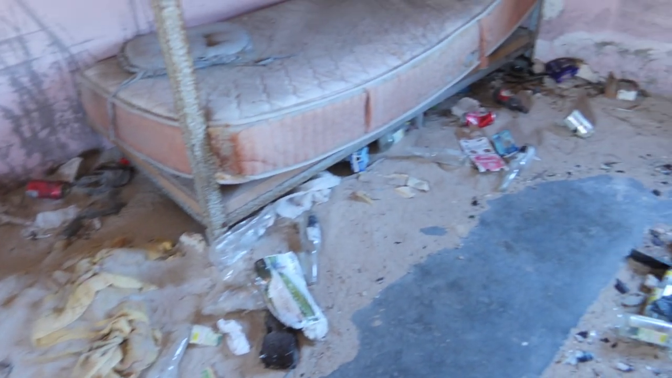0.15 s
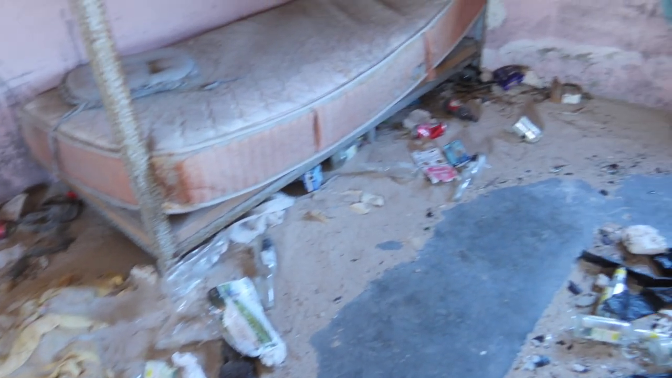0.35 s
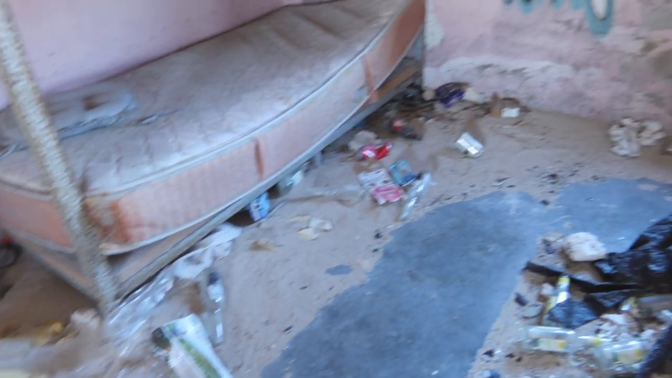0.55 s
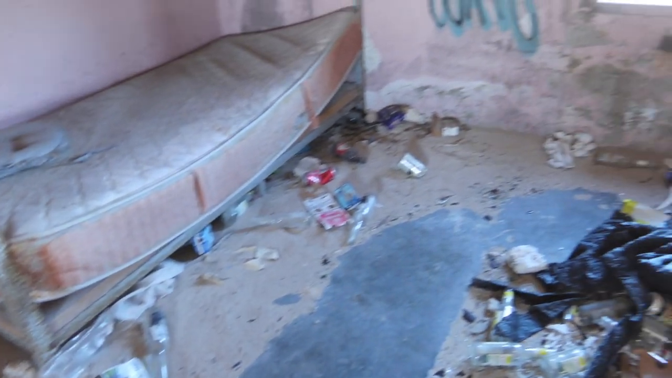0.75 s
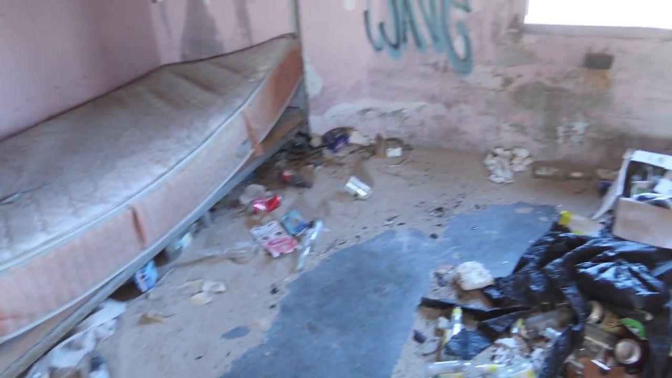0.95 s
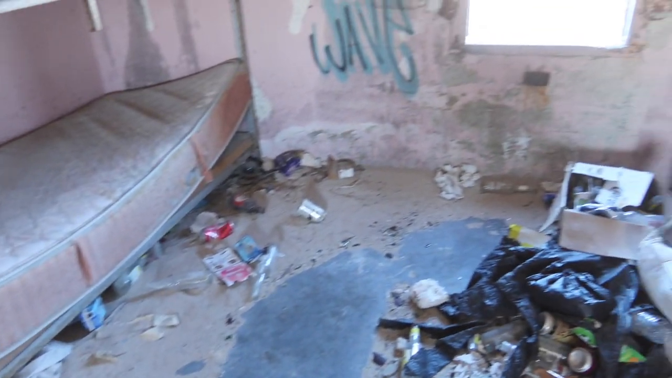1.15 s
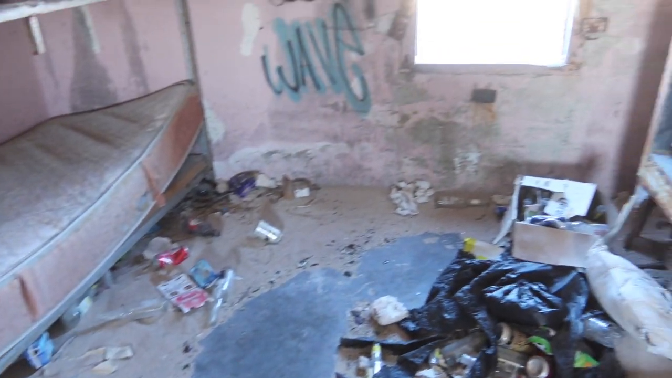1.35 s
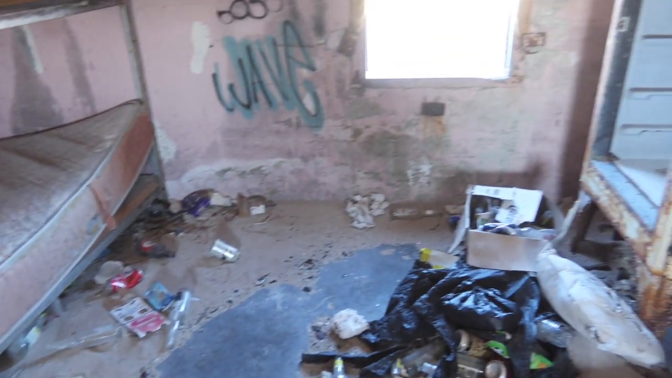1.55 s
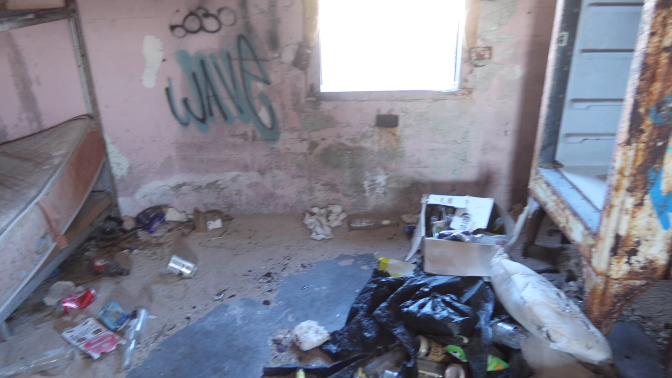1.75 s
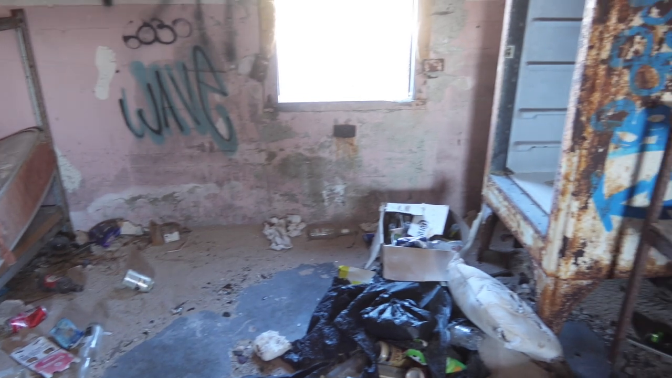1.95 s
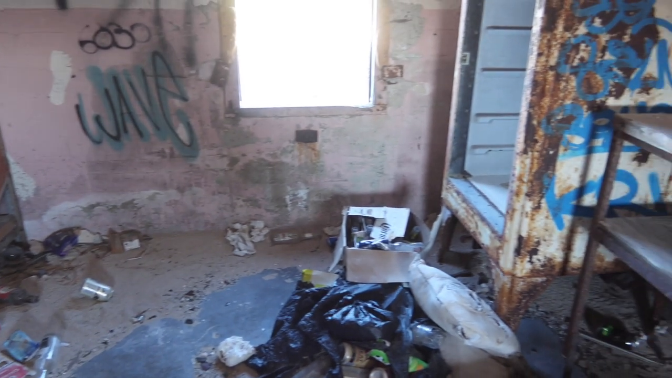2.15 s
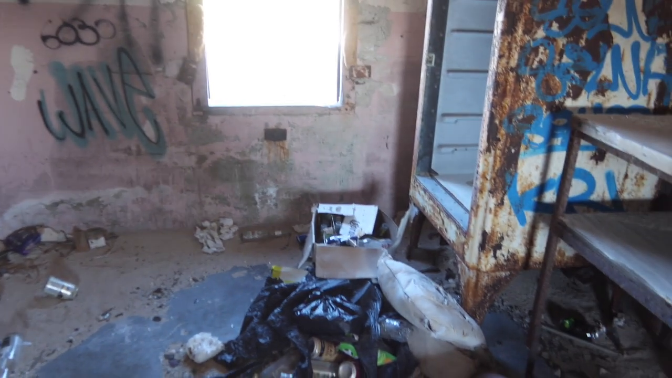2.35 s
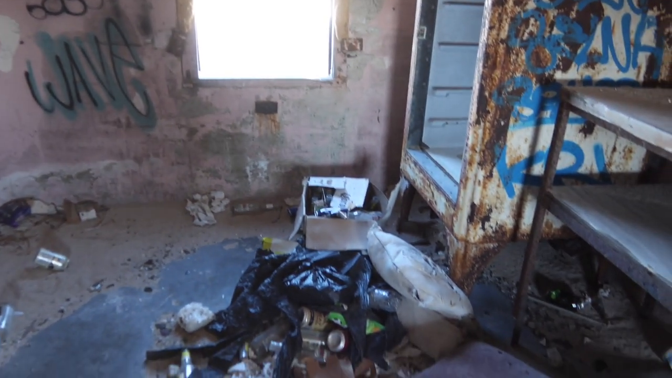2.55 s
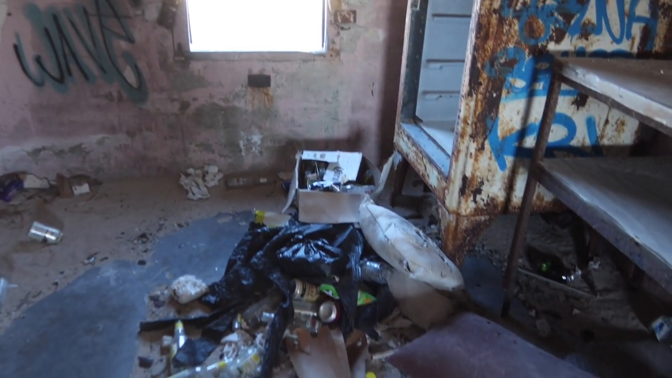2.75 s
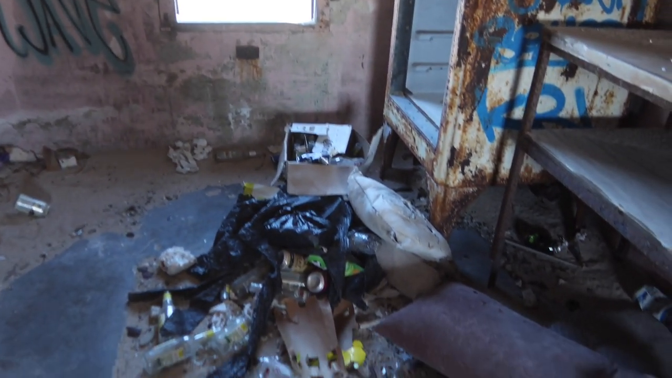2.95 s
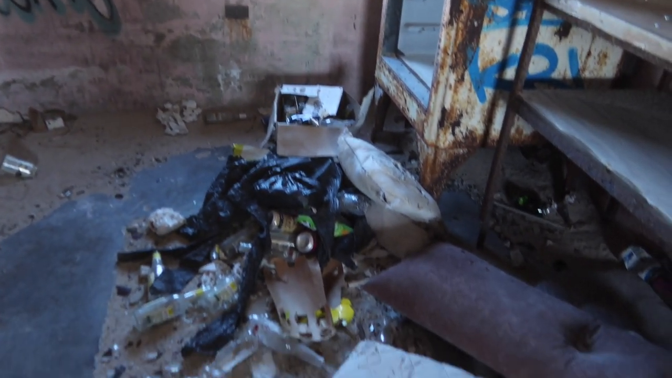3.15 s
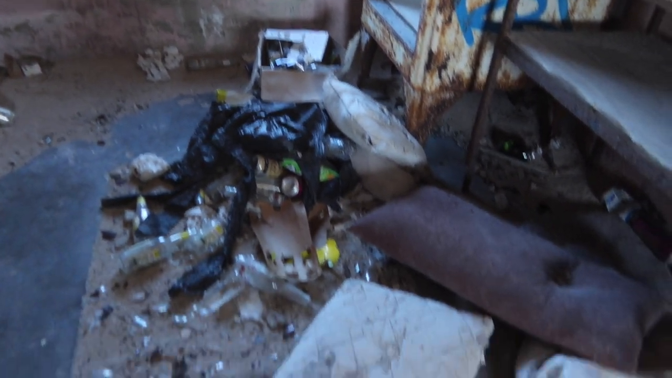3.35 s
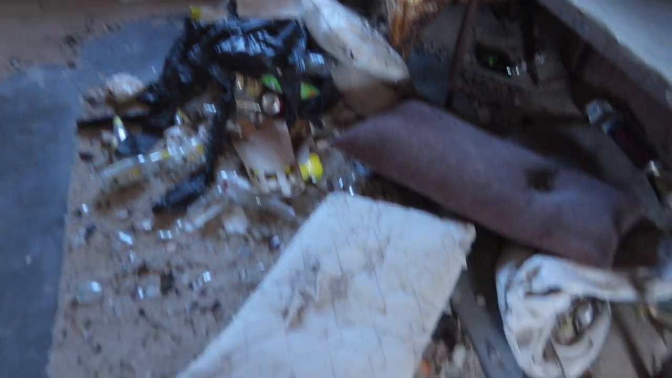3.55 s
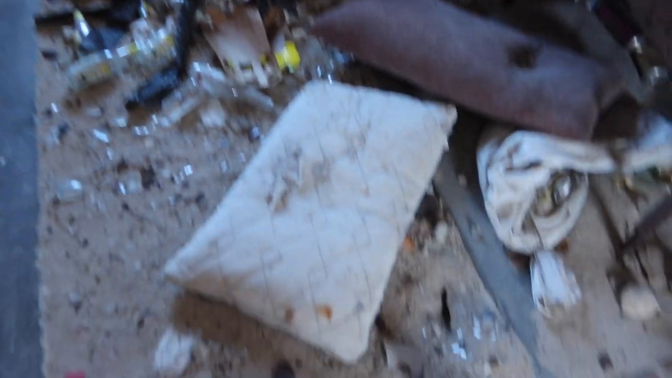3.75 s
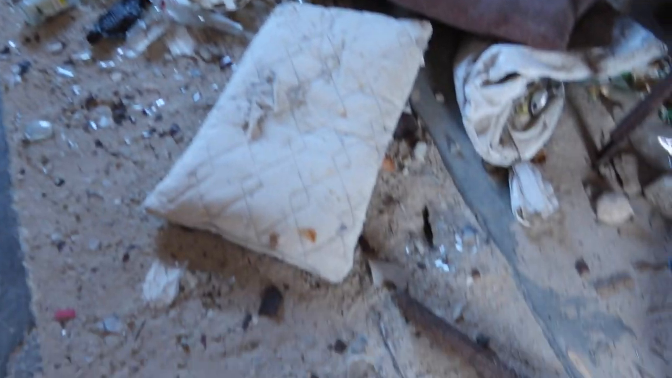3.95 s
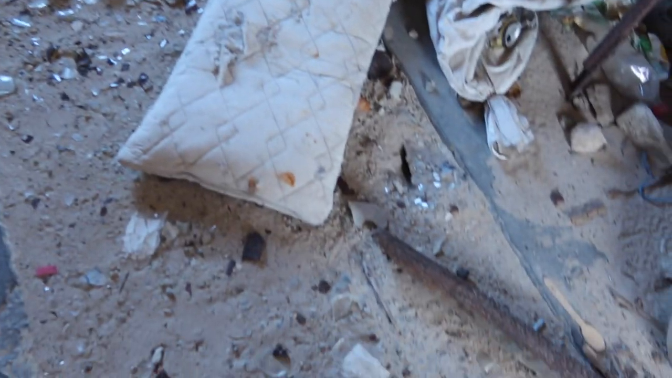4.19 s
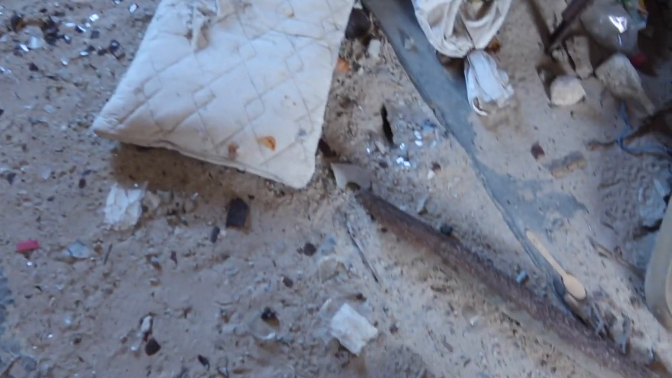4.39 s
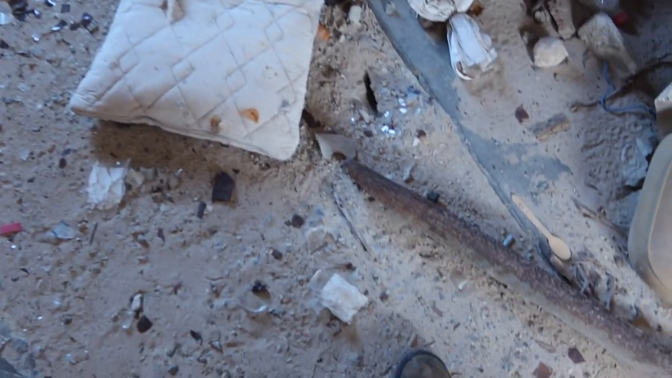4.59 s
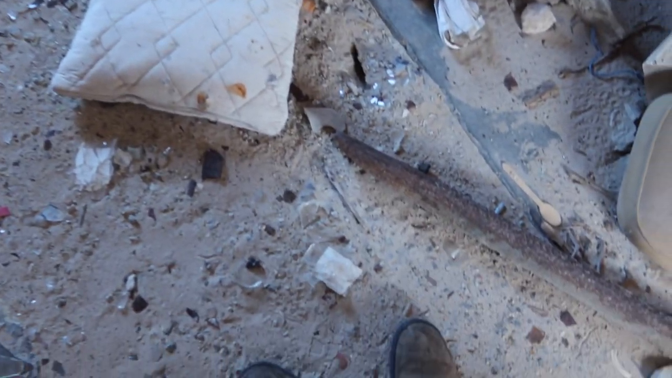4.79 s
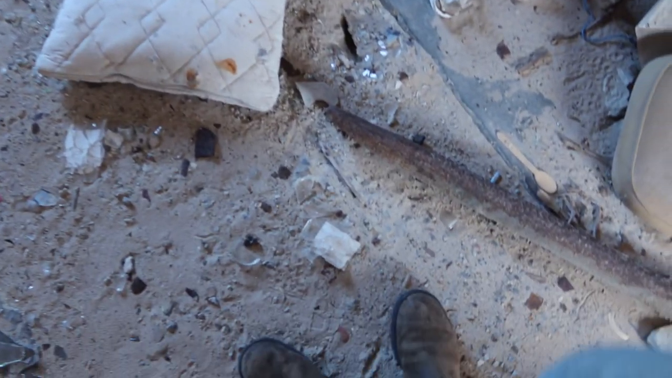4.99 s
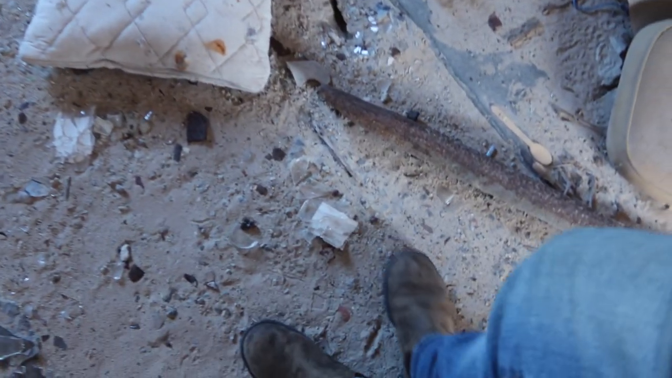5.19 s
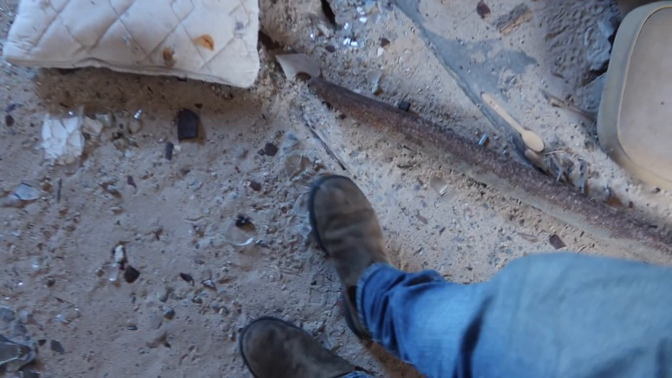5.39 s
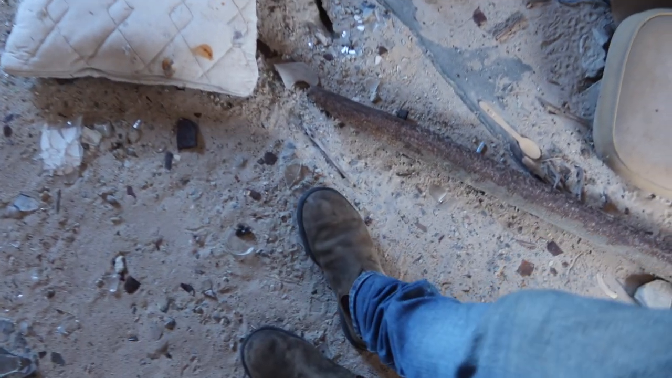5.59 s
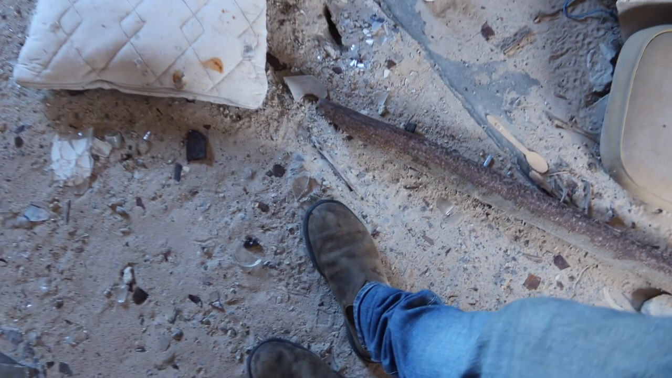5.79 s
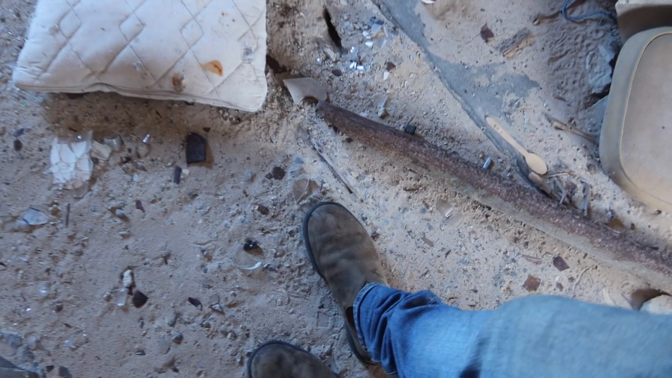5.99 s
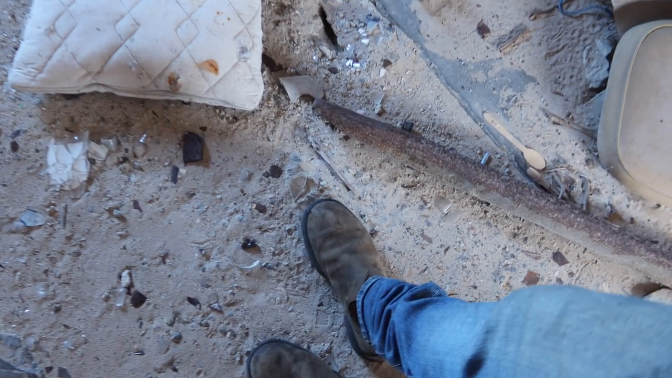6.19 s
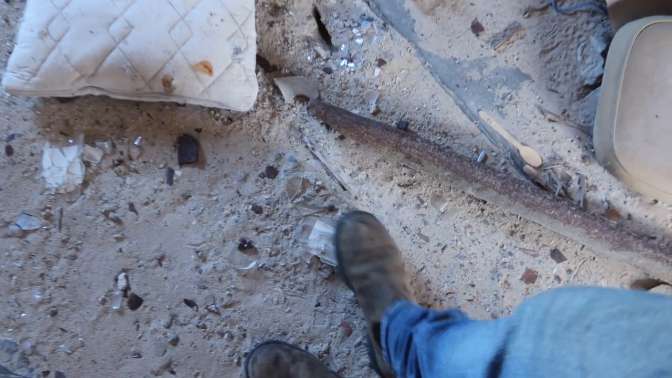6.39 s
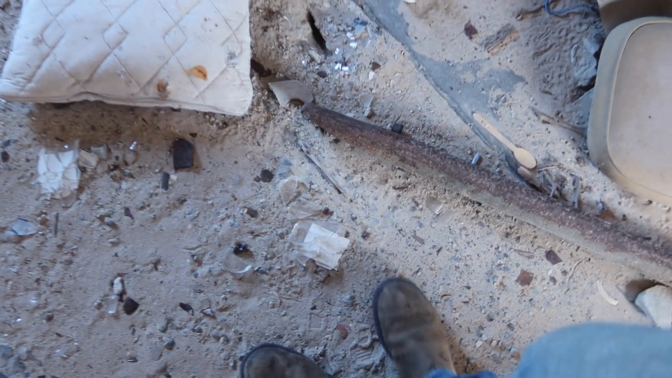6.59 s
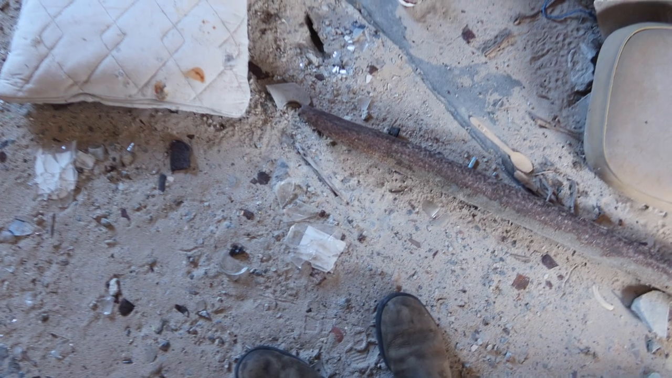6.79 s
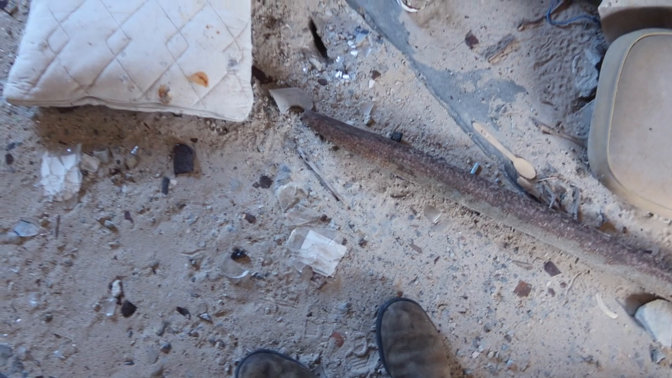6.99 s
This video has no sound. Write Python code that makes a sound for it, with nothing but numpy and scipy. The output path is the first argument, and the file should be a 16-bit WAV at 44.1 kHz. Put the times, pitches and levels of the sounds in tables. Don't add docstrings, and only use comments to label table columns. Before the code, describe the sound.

Close, handheld sound of boots on a littered concrete floor. Quick bright cracks and gritty crumbling come first, with a short glass tink, then lighter toe scuffs. A long pause holds only soft rumble and hiss and a small rattle of debris. Finally the sole crunches down hard, pops a stiff scrap, drags and settles, with a short reflection from bare walls.

```python
import sys
import numpy as np
from scipy import signal
from scipy.fft import rfft, irfft
from scipy.io import wavfile
from scipy.ndimage import uniform_filter1d

SR = 44100
rng = np.random.default_rng(int(sys.argv[2]) if len(sys.argv) > 2 else 0)


def gain_from_decibels(decibels):
    exponent = np.asarray(decibels, float) / 20
    return 10 ** exponent


def materialize(psi):
    bounded = np.clip(np.atleast_2d(psi).T, -1, 1)
    quanta = np.round(bounded * 32767).astype(np.int16)
    wavfile.write(sys.argv[1], SR, quanta)


N = 310464

# freq_hz, density_db (per Hz)
AIR = [(12, -6), (30, -5), (50, -16), (72, -7.5), (98, -17.5), (125, -8.5), (242, -12), (416, -14),
       (775, -20), (1130, -23.5), (3620, -32), (11000, -35.5), (16000, -37)]
# start_s, level_db
RUMBLE = [
    (0.0, -52.5),
    (1.78, -56),
    (2.12, -51),
    (7.04, -56),
]

# freq_hz, level_db
TREBLE = [
    [(3000, -22), (4500, -7.5), (5500, -4.5), (6500, -3.5), (8000, -8.5), (10500, -5), (13000, -10),
     (16000, -13)],
    [(3000, -33.5), (5500, -4), (6800, -5), (8400, -0.5), (10500, -11.5), (12500, -3), (13700, -4),
     (16000, -11.5)],
]
# freq_hz, level_db
SCUFF = [(70, -36), (130, -12), (200, -2), (600, 4), (1000, 3), (1600, 2.5), (3000, -17.5), (6000, -111.5)]
# freq_hz, level_db
TAP = [(150, -39.5), (400, -12.5), (700, -5), (1600, 3), (3000, -9.5), (6000, -60)]
SCRAP_S = 4.5, 6.42

# peak_s, rise_s, fall_s, level_db
TICKING = [(0, .05, 0.14, -51), (.39, 0.042, 0.038, -43), (.52, 0.035, 0.17, -44), (.587, .006, 0.026, -22),
           (1.2, 0.009, 0.096, -44), (1.73, 0.1, 0.13, -54), (1.98, 0.048, 0.05, -50),
           (2.64, 0.025, .07, -54), (5.6, 0.05, .2, -43.5), (5.706, 0.017, 0.012, -17),
           (5.86, 0.21, 0.085, -39), (6.21, 0.13, 0.17, -50), (6.36, 0.16, 0.21, -50)]
# peak_s, rise_s, fall_s, level_db, pitch_hz
GRINDING = [(0, .1, 0.18, -51.5, 3500), (.3, 0.053, 0.13, -47, 3380), (.47, 0.068, 0.071, -46.5, 2170),
            (0.591, 0.013, 0.11, -24.5, 1660), (.83, 0.035, 0.041, -38.5, 1320),
            (0.97, 0.0041, 0.08, -33, 1350), (1.199, 0.041, 0.095, -41, 2530),
            (1.26, 0.07, 0.036, -43, 1170), (1.7, 0.02, 0.18, -48, 2110), (1.99, 0.05, .1, -47.5, 3200),
            (2.08, 0.081, 0.052, -42, 1130), (2.642, 0.021, 0.2, -52.5, 1360),
            (5.58, 0.066, 0.13, -41.5, 1510), (5.709, 0.054, 0.13, -32.5, 2190),
            (5.821, 0.05, 0.12, -34.5, 1150), (5.91, 0.07, 0.098, -35.5, 3270),
            (5.98, 0.08, 0.1, -41, 2400), (6.21, 0.12, 0.35, -49, 2150), (6.37, 0.083, 0.098, -46, 1620),
            (6.734, 0.015, 0.016, -31.5, 1070)]
# peak_s, rise_s, fall_s, level_db
DRAGGING = [(.12, 0.46, 0.061, -58.5), (.34, 0.25, .07, -63), (.72, 0.47, 0.034, -43.5),
            (.93, .05, 0.13, -51), (1.2, 0.011, 0.13, -39.5), (2.03, 0.12, 0.05, -47),
            (2.65, 0.03, 0.1, -47.5), (2.75, 0.037, 0.15, -53), (5.57, 0.08, 0.088, -39),
            (5.81, 0.015, 0.16, -34), (6.45, 0.012, 0.22, -49.5), (6.735, 0.046, 0.083, -38.5),
            (6.96, 0.057, 0.063, -49.5)]
SWELL_DB = 15

# start_s, level_db, pitch_hz
TICKS = [(0.0067, -38, 3660), (0.0143, -37, 11800), (0.0358, -35, 7100), (0.0383, -49, 7100),
         (0.0675, -31, 5060), (0.0776, -29, 11400), (0.0839, -54, 6100), (0.1367, -35, 9600),
         (0.1444, -36, 3300), (0.1536, -42, 5100), (0.1701, -36, 7800), (0.2539, -44, 4700),
         (0.2602, -33, 3400), (0.2964, -35, 6100), (0.3027, -52, 5400), (0.3085, -47, 5700),
         (0.3389, -42, 6800), (0.3448, -43, 5300), (0.3574, -51, 5200), (0.3882, -43, 8000),
         (0.3928, -37, 7300), (0.4083, -38, 7900), (0.4776, -34, 3000), (0.5075, -29, 8700),
         (0.5376, -20, 5000), (0.5706, -27, 9000), (1.608, -40, 4200), (0.6011, -18, 5740),
         (0.6408, -16, 6000), (0.6792, -30, 4000), (0.7625, -43, 13100), (0.7678, -51, 5900),
         (0.7747, -36, 6600), (0.7895, -27, 6700), (0.7997, -13, 4930), (1.637, -44, 5300),
         (0.8209, -19, 5400), (0.8245, -50, 6900), (0.8445, -41, 9000), (0.8473, -22.5, 4000),
         (0.8545, -40, 8700), (0.8946, -34, 3000), (0.9028, -27, 9200), (0.9239, -30, 5000),
         (1.1596, -32, 12500), (1.2112, -46, 11800), (1.3489, -31.5, 5000), (1.3542, -52, 5900),
         (1.3598, -46, 6600), (1.5415, -45, 4800), (1.5557, -45, 7100), (1.5613, -37, 6900),
         (1.6887, -41, 6500), (1.6936, -29, 7100), (1.7251, -42, 5300), (1.8154, -34, 3100),
         (1.9256, -51, 6200), (1.9705, -33, 4200), (2.012, -22.5, 2980), (2.0343, -42, 7600)]
# start_s, level_db, pitch_hz
NUDGES = [(0.1165, -40, 3400), (0.1222, -23.5, 3460), (0.1386, -34, 3380), (0.1478, -37, 3500),
          (0.1623, -33, 3600), (0.277, -24, 4830), (0.2795, -26, 5200), (0.4135, -29.5, 3500),
          (0.4296, -44, 2200), (0.4345, -33, 3180), (0.4544, -45, 3040), (0.4597, -33, 2350),
          (0.5562, -22, 3380), (0.562, -28, 2600), (0.7106, -33, 2800), (0.8726, -27, 5100),
          (1.153, -43, 1600), (1.1646, -27.5, 2900), (1.1725, -48, 3700), (1.2766, -29, 3830),
          (1.6993, -26, 5400), (1.7883, -35, 2130), (1.8211, -36, 2200), (1.6835, -27.5, 2280),
          (1.7495, -21.5, 2000), (2.0708, -31, 2800), (1.7095, -26, 2400), (2.6548, -42, 1600),
          (5.5448, -36, 2260), (5.557, -36, 1600), (5.9083, -31, 3800), (5.9122, -33, 3700),
          (5.9155, -28, 3800), (5.9177, -33, 4000), (5.9665, -28, 3000), (5.9462, -18, 2090),
          (6.0352, -29, 2250), (6.0551, -23, 2270), (6.2205, -35, 3600), (6.7368, -28, 2500),
          (6.7864, -33, 2400), (6.9476, -32, 2950)]
# start_s, level_db, pitch_hz, length_ms
CRUNCHES = [
    (.132, -34, 4100, 5.9),
    (.6, -23.5, 4200, 230),
    (1.1824, -22.5, 5500, 17),
    (2.002, -30, 5330, 8.8),
    (5.5866, -24.5, 2110, 3.5),
    (5.682, -16, 1100, 22),
    (5.688, -20.5, 3470, 26),
    (6.3418, -27, 5400, 10),
]
# start_s, level_db, pitch_hz
CRUMBS = [(1.338, -27, 6570), (1.5455, -29.5, 3960), (1.5469, -26, 10470), (1.5487, -35, 6000),
          (1.674, -29, 4160), (1.683, -19, 5700), (1.7092, -22.5, 6550), (1.7489, -22, 5730),
          (1.7521, -20.5, 4900), (1.7601, -19, 4900), (1.7994, -27, 6400), (1.8307, -31.5, 8150),
          (1.9154, -25.5, 5400), (1.9504, -28, 6000), (2.0041, -21, 5000), (.217, -52, 3500),
          (1.492, -40, 7800), (6.5313, -42, 9800), (6.7175, -30, 12700), (7.0313, -25.5, 8700)]
# start_s, level_db, pitch_hz
SPLINTERS = [(.2431, -22.5, 3900), (.2692, -25, 4650), (.2752, -30, 5250), (.2863, -42, 6100),
             (.3287, -18.5, 4900), (.3598, -23.5, 12000), (.3719, -17, 10100), (.3821, -20.5, 2460),
             (.443, -23, 4340), (.467, -20.5, 4930), (.483, -21.5, 4700), (.491, -14, 4800),
             (.4994, -33, 5210), (.5111, -17, 5000), (.5403, -13, 2340), (.5458, -11, 5150),
             (.6708, -13, 2450), (.8309, -22, 9000), (1.1908, -16, 6200), (1.1947, -26, 4930)]
# start_s, level_db, pitch_hz
PEBBLES = [(.377, -20.5, 3730), (.452, -24.5, 2520), (.5299, -7, 4470), (.5981, -4.5, 1730),
           (.862, -37, 1290), (.8722, -26, 1220), (.9367, -22.5, 3400), (.9412, -18.5, 3220),
           (.9977, -12, 3300), (1.17, -30, 2500), (1.283, -42, 1470), (1.7294, -27.5, 4900),
           (5.8403, -10, 2340), (5.8867, -24.5, 2800), (5.8961, -1, 2020), (5.926, -13.5, 2900),
           (6.005, -3.5, 2140), (6.2556, -22.5, 4140), (6.2854, -24.5, 2000), (6.3543, -18, 1530),
           (6.7917, -36.5, 3800), (6.9073, -36, 2500), (6.937, -33.5, 1380), (6.9449, -26, 1570)]
# start_s, level_db, pitch_hz
CRACKS = [(.5818, 3, 6150), (.5848, 0.5, 4400), (.7971, -19, 8400), (.8046, -15, 6440), (.8145, -12, 8550),
          (.9053, -41, 6300), (.9583, 1.5, 6260), (6.716, -47, 5000), (6.46, -24.5, 4370),
          (6.7282, -49, 7600), (2.0475, -26.5, 1120), (2.6308, -32.5, 2320), (5.009, -43, 7500),
          (5.1774, -36, 2870), (5.2877, -37, 7650), (5.6999, -6.5, 7300), (5.8355, -16, 1610)]
# start_s, level_db, pitch_hz, length_ms
THUMPS = [
    (.7975, -20, 980, 2.7),
    (.8148, -22, 1070, 1.9),
    (1.1531, -29, 1400, 26),
    (1.1558, -28, 1043, 11),
    (5.058, -37, 706.6, 6.5),
    (5.4831, -33.5, 1110, 5.3),
    (6.424, -23, 507, 7.6),
    (6.44, -28.5, 576, 23),
    (6.716, -22.5, 1020, 4.9),
    (6.7257, -24, 1430, 10),
]
# start_s, level_db, pitch_hz, length_ms
SHATTERS = [
    (.952, -20, 3950, 2),
    (.9595, -13, 2920, 1.9),
    (.9741, -12.5, 2030, 2.7),
    (5.795, 2, 960, 1.7),
]
# start_s, level_db, pitch_hz
CLODS = [(1.2663, -22.5, 1350), (2.0654, -27, 955), (2.0922, -29, 1190), (2.7297, -34, 1290),
         (4.9671, -37, 950), (5.5652, -22, 1230), (5.7726, -17.5, 1120), (5.8106, -39, 890),
         (6.4403, -22.5, 1430), (6.4586, -41, 905), (6.6782, -21.5, 900), (6.6903, -27, 1380),
         (6.7155, -25, 880), (6.7766, -34, 910)]
# start_s, level_db, pitch_hz
LATE_TICKS = [(5.1885, -40, 8500), (5.5384, -40, 11100), (5.625, -37, 6500), (5.6548, -22, 3400),
              (5.679, -39, 13900), (5.6836, -15, 9400), (5.734, -19, 9100), (5.7368, -14, 13600),
              (5.9005, -16.5, 4000), (5.7087, -11.5, 3780), (6.0458, -34.5, 3300), (5.8315, -22, 6000),
              (6.0946, -30, 3600), (5.879, -24.5, 4000), (6.2102, -32, 3400), (6.2718, -39, 6700),
              (6.2999, -42, 3900), (6.3172, -33, 4940), (6.3721, -32, 5100), (6.369, -31, 10000),
              (6.4063, -55, 9600), (6.4309, -40, 5300), (6.4818, -33, 3300), (6.4859, -38, 8100),
              (6.5179, -46, 13600), (6.551, -41, 3000), (6.5724, -42.5, 3000), (5.8165, -27, 3500),
              (6.6676, -41, 3000)]
# start_s, level_db, pitch_hz, length_ms
SPITS = [
    (5.5731, -25, 6700, 8.3),
    (5.609, -12.5, 7260, 0.76),
    (5.7069, -17, 7250, 5.9),
    (5.728, -27, 3300, 10),
]
# start_s, level_db, pitch_hz
POPS = [(5.6059, -29, 7480), (5.6147, -33, 9300), (5.6214, -26, 8000), (5.6303, -32, 9000),
        (5.6372, -11.5, 3370), (5.6443, -10.5, 7150), (5.7574, -21, 8300), (5.776, -15.5, 3600),
        (5.7798, -8, 5850), (5.7814, -12.5, 8150), (5.8623, -6.5, 3820), (5.8713, -10, 3500),
        (5.9322, -9.5, 2600), (5.9783, -3, 2370), (5.9825, -5.5, 2400), (5.9894, -19, 1740),
        (6.0185, -20, 5070), (6.0278, -11.5, 2560), (6.0909, -26.5, 3310), (6.115, -29.5, 2480),
        (6.1661, -30, 3700), (6.1791, -46, 3660), (6.1982, -12, 2220), (6.2458, -19.5, 2060),
        (6.2774, -29, 8500), (6.3062, -30, 5000), (6.3217, -26, 8400), (6.613, -34, 7800)]
# start_s, level_db, pitch_hz
KNOCKS = [
    (5.694, -24, 1070),
    (5.697, -17, 1092),
    (5.7035, -11, 1160),
    (5.7082, -19, 1100),
]
# events, body_db (over ring), treble_db (over ring)
MATERIALS = [
    (SPLINTERS, -42, -3.5),
    (CRUMBS, -25, -1.2),
    (PEBBLES, -14.5, -20),
    (CLODS, 17, -25),
    (CRACKS, -1.6, 0.57),
    (POPS, -11.5, 0),
    (SPITS, -13, 36),
    (CRUNCHES, -7.5, -4.9),
    (SHATTERS, -6, -9),
    (THUMPS, 6.4, -33),
             (TICKS, -32, 0.46),
    (LATE_TICKS, -20, 1.1),
    (NUDGES, -30, -13.5),
    (KNOCKS, -5.5, -2),
]
# shortest_ms, longest_ms
BOUNCE_MS = (.12, .45)

# peak_s, rise_s, fall_s, level_db, pitch_hz, sharpness_q
SQUEAKS = [(0.383, .015, 0.028, -41, 2100, 4.9), (.455, .015, 0.068, -42, 2280, 6),
           (.536, 0.0078, 0.054, -31.5, 2300, 6), (.865, 0.026, .04, -39, 1305, 6),
           (1.187, 0.0052, 0.052, -27.5, 6340, 7.5), (1.205, 0.028, 0.041, -35.5, 12600, 6.4),
           (1.767, 0.026, 0.042, -36.5, 2060, 0.92), (6.356, 0.019, 0.04, -37, 1560, 1.5),
           (6.358, .03, 0.044, -45, 14300, 8), (6.375, 0.06, 0.017, -46, 5800, 5.6),
           (6.445, 0.016, .03, -37, 550, 3.3), (.6, .02, .12, -36, 195, 2),
           (2.9, 0.085, 0.065, -45, 380, 0.83)]

SHARD_HZ = [3435, 5369, 5207, 12295, 8836, 10975, 10914, 11855, 11895, 8812, 12025, 12171]
# level_db, t60_s
SHARD = [(-22, .19), (-16, .06), (-23, .1), (-19, .07), (-29, .33), (-22, .15), (-18, .18), (-20, .18),
         (-11, .085), (-32, .3), (-17, .09), (-18, .13)]
# start_s, level_db, pitch_hz, t60_s
SLIVERS = [
    (5.573, -26, 9700, .02),
    (5.574, -27, 14200, .025),
    (5.93, -20, 13600, .015),
    (6.343, -30, 6000, .02),
    (6.352, -31, 14500, .03),
    (2.003, -55, 13400, .2),
    (.972, -16, 5364, .08),
    (1.007, -29, 5374, .2),
]

# start_s, level_db
CHIP_TIMES = [
    (3.6763, -35),
    (3.7286, -43),
    (3.7368, -47),
    (3.7636, -20),
    (3.6985, -47),
    (3.77, -39),
    (3.773, -42),
    (3.785, -39),
    (3.798, -41),
]
# pitch_hz, level_db, t60_s
CHIP = [(5640, 3.5, 0.006), (5820, -6, 0.0045), (5400, -8, 0.0084), (7000, -8, 0.0064),
        (11800, -11, 0.0062)]

# freq_hz, t60_s
WALLS = [(200, 0.46), (700, 0.24), (2000, 0.27), (5000, 0.23), (12000, 0.19)]
# delay_ms, level_db
EARLY = [(4.2, -12.5), (7.5, -52), (11, -42), (16.5, -19), (25, -12), (39, -9)]
# first_steps_db, last_nearer_steps_db, glass_db
WET_DB = [-8.5, -11, -10]


def evened(x):
    return x / np.sqrt(np.mean(x ** 2) + 1e-20)


def read(points, hz):
    f, value = np.transpose(points)
    return np.interp(np.log(hz + 1), np.log(f + 1), value)


def add(mix, s, sound):
    part = mix[round(s * SR):][:len(sound)]
    part += sound[:len(part)]


def causal(points):
    hz = abs(np.fft.fftfreq(4096, 1 / SR))
    log_gain = np.log(gain_from_decibels(np.maximum(read(points, hz), -80)))
    return np.fft.ifft(np.exp(np.conj(signal.hilbert(log_gain)))).real[:1024]


def ring(x, hz, q):
    return signal.lfilter(*signal.iirpeak(min(hz, SR / 2.2), max(q, .3), SR), x)


def mode(t, hz, db, t60):
    return gain_from_decibels(db - 60 * t / t60) * np.sin(2 * np.pi * hz * t)


def on_scrap(s):
    return (s > SCRAP_S[0]) & (s < SCRAP_S[1])


def air():
    frames, hz = N // 256 + 5, np.fft.rfftfreq(1024, 1 / SR)
    a, b, patches = rng.standard_normal((frames, 513, 3)).T
    patches = evened(uniform_filter1d(uniform_filter1d(patches, 4, 0), 12, 1))
    s, db = np.transpose(RUMBLE)
    swell_db = np.interp(np.arange(frames) * 256 / SR, s, db - db.mean())
    hz = hz[:, None]
    low = 1 / (1 + (hz / 1500) ** 2)
    moving_db = low * (3.4 * patches * hz / (hz + 150) + swell_db)
    moving = signal.istft((a + 1j * b) * gain_from_decibels(moving_db), nperseg=1024, noverlap=768)[1][:N]
    colour = gain_from_decibels(read(AIR, np.fft.rfftfreq(N, 1 / SR)))
    return gain_from_decibels(-49.5) * evened(irfft(rfft(moving) * colour, N))


def grains(per_s, spread_db):
    size = gain_from_decibels(spread_db * np.minimum(rng.exponential(1, N), 3))
    return evened(size * rng.standard_normal(N) * (rng.random(N) < per_s / SR))


def fine_grit():
    clumps = gain_from_decibels(3.5 * evened(uniform_filter1d(rng.standard_normal(N), size=260)))
    shared = grains(1100, 2.6)
    sizes_hz = np.geomspace(4000, 14500, 5)
    return clumps * sum(evened(ring(.6 * shared + grains(900, 2.8), hz, 3.1)) for hz in sizes_hz)


def press(t, s, rise, fall, db):
    away = np.maximum((s - t) / max(rise, .005), (t - s) / max(fall, .005))
    return gain_from_decibels(db - SWELL_DB * away)


def rolled(x, hz, q):
    turn = np.exp(2j * np.pi * hz * np.arange(1, len(x) + 1) / SR)
    r = np.exp(-np.pi * hz / q / SR)
    once = signal.lfilter([1 - r], [1, -r], x / turn)
    return 2 * (turn * signal.lfilter([1 - r], [1, -r], once)).real


def tread():
    fine, coarse, rub = fine_grit(), grains(3200, 2.4), grains(2200, 2.4)
    t, knots = np.arange(N) / SR, np.arange(0, N / SR, .002)
    plain, scrap = (evened(signal.oaconvolve(fine, causal(c))[:N]) for c in TREBLE)
    scuff = evened(signal.oaconvolve(rub + 1.5 * coarse, causal(SCUFF))[:N])
    fine_gain = np.interp(t, knots, sum(press(knots, *row) for row in TICKING))
    scuff_gain = np.interp(t, knots, sum(press(knots, *row) for row in DRAGGING))
    out = fine_gain * np.where(on_scrap(t), scrap, plain) + scuff_gain * scuff
    for s, rise, fall, db, hz in GRINDING:
        part = slice(max(round((s - 2 * rise) * SR), 0), min(round((s + 2 * fall) * SR), N))
        narrow = evened(rolled(coarse[part], hz, 2.5))
        broad = evened(rolled(coarse[part], hz, .6))
        out[part] += press(t[part], s, rise, fall, db) * (0.021 * narrow + 1.19 * broad)
    return out


def splinter_burst(z, ms):
    t = np.arange(len(z)) / SR
    attack = np.minimum(t / (1e-4 * ms), 1)
    shape = np.exp(-t / (0.0014 * max(ms - .8, .1))) * attack
    spectrum = rfft(z * shape)
    even = spectrum / uniform_filter1d(abs(spectrum), size=len(z) // 128) ** 0.67
    burst = np.sqrt(shape) * irfft(even)
    lag = round(np.interp(np.tanh(z[-1]), (-1, 1), BOUNCE_MS) * SR / 1000)
    return burst + .3 * np.roll(burst, lag)


def snaps():
    q, skirt_db, snap_ms = 1.3, -5, 1.35
    out = np.zeros(N)
    rows = []
    for events, body_db, treble_db in MATERIALS:
        rows += [(*row, snap_ms)[:4] + (body_db, treble_db) for row in events]
    colours = [causal(c) for c in TREBLE]
    full_sole, light_sole = causal(SCUFF), causal(TAP)
    wide = signal.butter(2, [1200, 8000], "band", fs=SR)
    noise = rng.standard_normal((len(rows), 4096))
    for (s, db, hz, ms, body_db, treble_db), z in zip(rows, noise):
        short = ms < 2
        burst = splinter_burst(z[:1024] if short else z, ms)
        size = len(burst)
        skirt = evened(signal.lfilter(*wide, burst))
        piece = evened(ring(ring(burst, hz, q), hz, q)) + gain_from_decibels(skirt_db) * skirt
        sole = light_sole if body_db < -8 else full_sole
        body = signal.fftconvolve(burst, sole)[:size]
        spray = signal.fftconvolve(burst, colours[int(on_scrap(s))])[:size]
        snap = evened(piece) + gain_from_decibels(body_db) * evened(body) + gain_from_decibels(treble_db) * evened(spray)
        power = 2 * uniform_filter1d(snap ** 2, size=24)
        lead = power.argmax() / SR if short else 3e-4
        add(out, s - lead, gain_from_decibels(db) * snap / np.sqrt(power.max()))
    return out


def squeaks():
    out, slips, t = np.zeros(N), grains(2600, 0.99), np.arange(N) / SR
    for s, rise, fall, db, hz, q in SQUEAKS:
        part = slice(round((s - 2 * rise) * SR), round((s + 2 * fall) * SR))
        squeal = evened(ring(ring(slips[part], hz, q), hz, q))
        out[part] += press(t[part], s, rise, fall, db) * squeal
    return out


def shard():
    out, t = np.zeros(N), np.arange(SR // 3) / SR
    tones = sum(mode(t, hz, db, t60) for hz, (db, t60) in zip(SHARD_HZ, SHARD))
    add(out, .958, gain_from_decibels(-2.5) * tones)
    return out


def slivers():
    out, t = np.zeros(N), np.arange(SR // 5) / SR
    attack = np.minimum(t / 0.00059, 1)
    for s, db, hz, t60 in SLIVERS:
        add(out, s, mode(t, hz, db, t60) * attack)
    return out


def chip():
    out, t = np.zeros(N), np.arange(2000) / SR
    tones = sum(mode(t, hz, db, t60) for hz, db, t60 in CHIP)
    attack = np.minimum(t / 0.00023, 1)
    for s, db in CHIP_TIMES:
        add(out, s, gain_from_decibels(db) * tones * attack)
    return out


def room(x):
    out, turn = np.zeros(N), np.pi * np.arange(N) / SR * 9
    for k in range(3):
        taps = np.zeros(SR // 2)
        at = np.arange(130, SR // 2 - 20, 20)
        taps[at + rng.integers(0, 20, len(at))] = rng.choice([-1., 1.], len(at))
        hz, t, z = signal.stft(taps, SR, nperseg=256)
        decay = gain_from_decibels(-60 * t / read(WALLS, hz)[:, None])
        tail = signal.istft(z * decay, SR, nperseg=256)[1]
        tail /= np.linalg.norm(tail)
        for ms, db in EARLY:
            tail[round(ms * rng.uniform(.97, 1.03) * SR / 1000)] += gain_from_decibels(db)
        share = np.sqrt(2 / 3) * abs(np.cos(turn + k * np.pi / 3))
        out += signal.oaconvolve(x * share, tail)[:N]
    return out


def scene():
    no_bass = signal.butter(3, 115, "high", fs=SR, output="sos")
    boots = signal.sosfilt(no_bass, snaps() + tread() + slivers() + squeaks())
    glass = shard() + chip()
    first_db, last_db, glass_db = WET_DB
    wet = gain_from_decibels(np.where(np.arange(N) / SR < SCRAP_S[0], first_db, last_db))
    return (boots + glass + room(wet * boots + gain_from_decibels(glass_db) * glass) + air())[None]


def roll_off(x):
    return signal.sosfilt(signal.butter(12, 15790, fs=SR, output="sos"), x)


def record(dry):
    clipped = np.clip(dry, -.96, .96)
    no_drift = signal.lfilter(*signal.butter(1, 12, "high", fs=SR), clipped)
    edge = signal.firwin(101, 16300, window=("kaiser", 6), fs=SR)
    return roll_off(signal.oaconvolve(no_drift, edge[None], "same"))


dry = scene()
out = record(dry)
materialize(out)
```